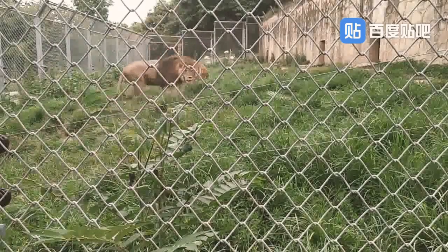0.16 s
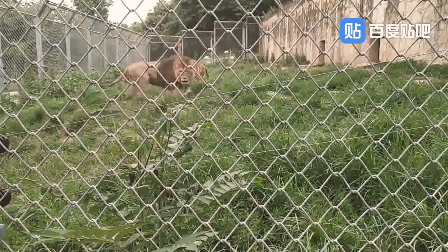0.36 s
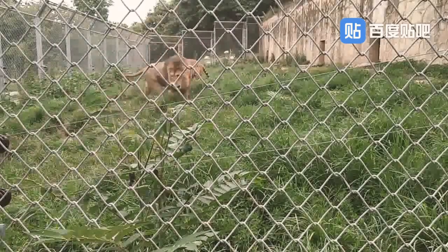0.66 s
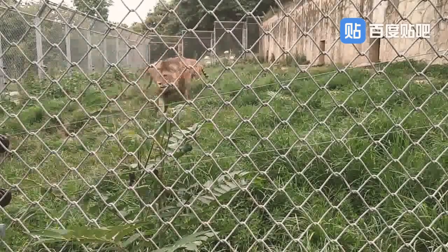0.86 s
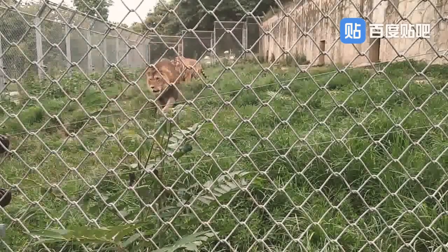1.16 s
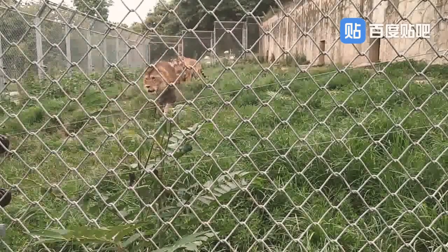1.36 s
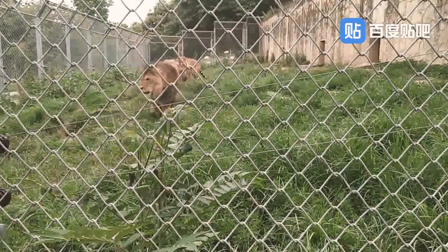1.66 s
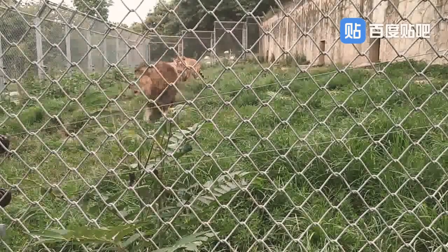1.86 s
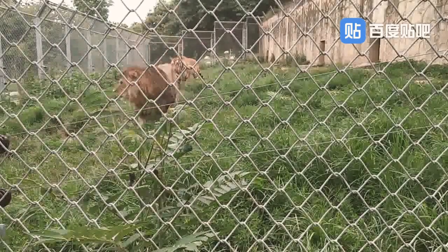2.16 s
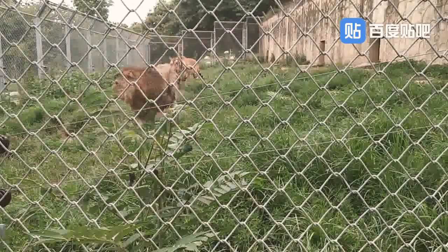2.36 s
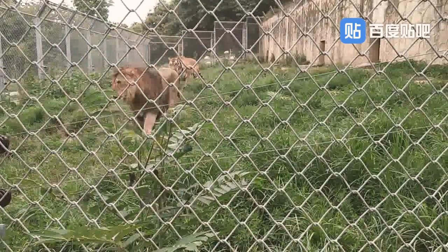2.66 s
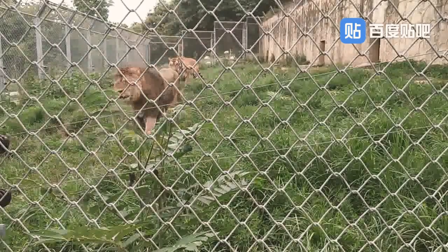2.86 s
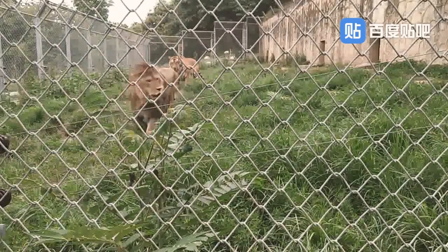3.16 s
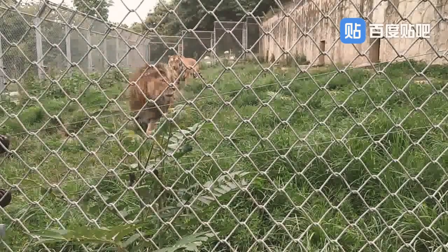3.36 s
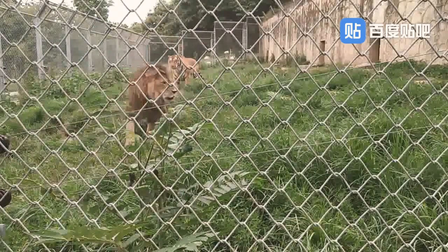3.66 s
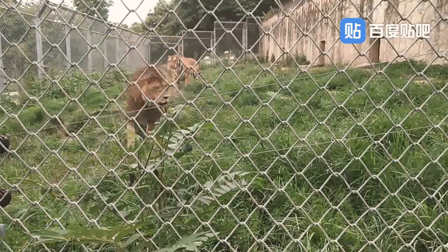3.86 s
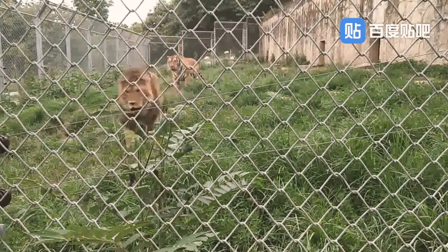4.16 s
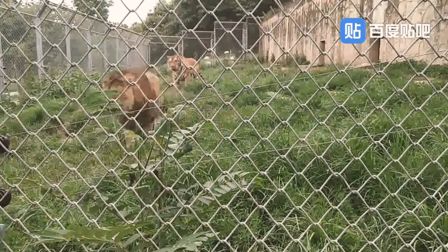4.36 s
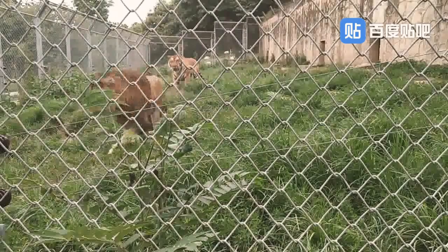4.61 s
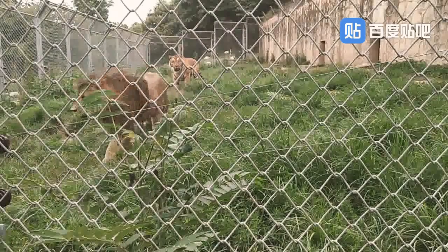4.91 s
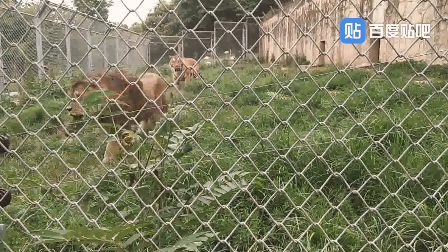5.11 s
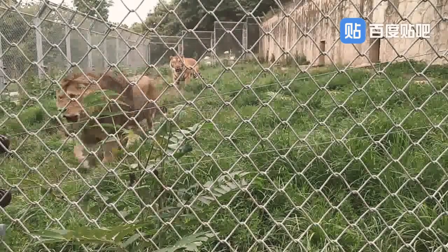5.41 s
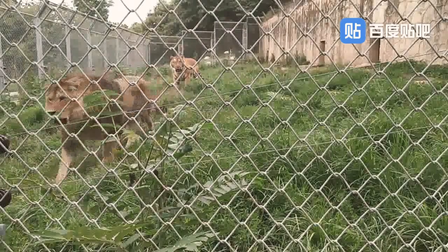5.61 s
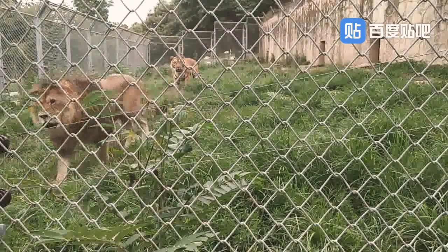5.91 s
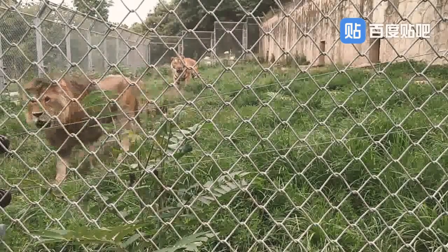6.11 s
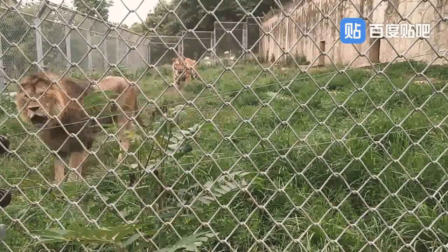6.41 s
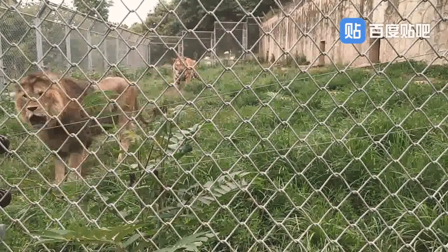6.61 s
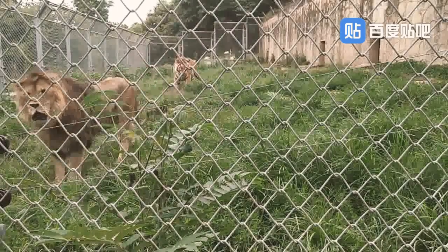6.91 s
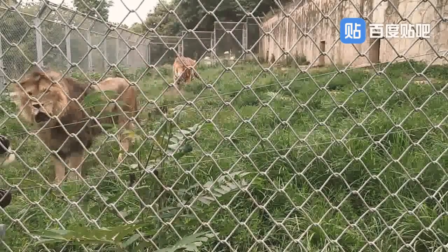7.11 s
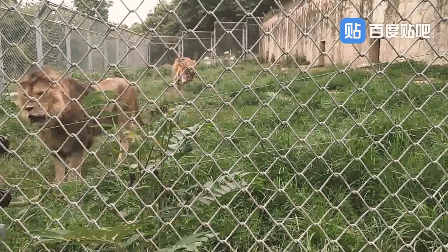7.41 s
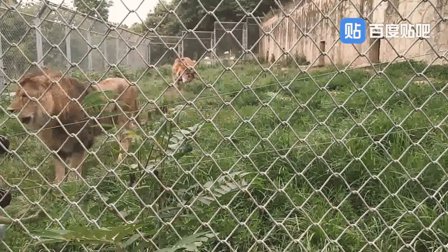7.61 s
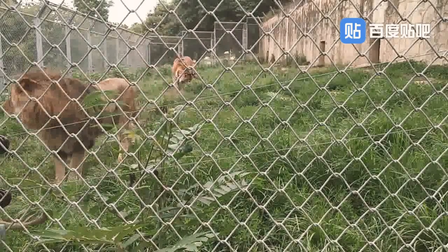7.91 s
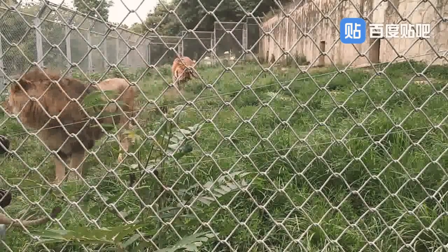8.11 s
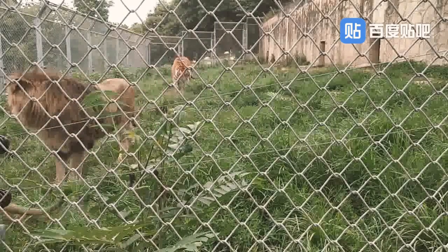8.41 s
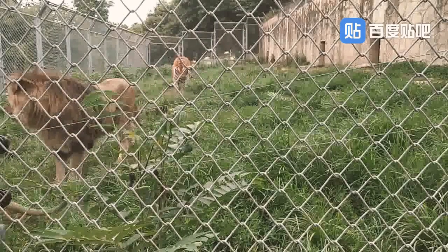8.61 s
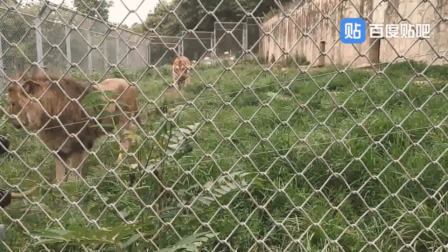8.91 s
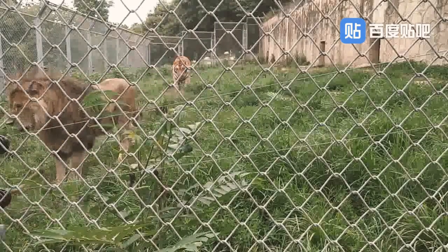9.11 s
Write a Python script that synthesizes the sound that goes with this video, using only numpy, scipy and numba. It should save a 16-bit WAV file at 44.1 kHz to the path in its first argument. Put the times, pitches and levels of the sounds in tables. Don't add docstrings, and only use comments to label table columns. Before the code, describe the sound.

A lion grunts in rapid deep bursts, each a slack, fluttering growl followed by a rasping in-breath, with harsh hisses past the teeth early on. The grunts slow to one every second or less and soften. Cicadas hiss steadily, a far bird chirps in the second half, and another cat rumbles near the end. Outdoors on a grassy slope, mono-like, with a short diffuse echo.

```python
import sys
import numpy as np
from scipy import signal
from scipy.fft import rfft, irfft
from scipy.io import wavfile
from scipy.ndimage import uniform_filter1d
from numba import njit

SR = 44100
rng = np.random.default_rng(int(sys.argv[2]) if len(sys.argv) > 2 else 0)


def transcribe(u):
    v = np.clip(np.atleast_2d(u).T, -1, 1)
    q = np.round(v * 32767).astype(np.int16)
    wavfile.write(sys.argv[1], SR, q)


def volts_from_decibels(level):
    exponent = np.asarray(level, float) / 20
    return 10 ** exponent


N = 408366


def level(x, db):
    return x * volts_from_decibels(db) / np.sqrt(np.mean(x ** 2))


def noise():
    return rng.standard_normal(N)


def curves(table):
    s, *columns = np.transpose(table)
    return [np.interp(np.arange(N) / SR, s, c) for c in columns]


@njit
def svf(x, hz, width):
    y, b, l = np.empty(len(x)), 0., 0.
    for i in range(len(x)):
        g, k = np.tan(np.pi * hz[i] / SR), width / hz[i]
        v = (b + g * (x[i] - l)) / (1 + g * (g + k))
        b, l, y[i] = 2 * v - b, l + 2 * g * v, k * v
    return y


def ring(x, hz, width_hz, skirt=4.46):
    hz = hz + np.zeros(N)
    narrow = svf(x, hz, 1. * width_hz)
    return svf(narrow, hz, skirt * width_hz) / np.sqrt(np.pi * width_hz / SR)


def walk(rate):
    k = int(SR / rate)
    held = np.repeat(rng.standard_normal(N // k + 1), k)
    return 1.3 * uniform_filter1d(uniform_filter1d(held, k), k)[:N]


def coloured(spectrum):
    hz, db = np.transpose(spectrum)
    f = np.maximum(np.arange(N // 2 + 1) * SR / N, 1)
    gain = volts_from_decibels(np.interp(np.log(f), np.log(hz), db, -90, -90))
    return irfft(rfft(noise()) * gain, N)


def tent(peak, db, swell_ms, fall_ms):
    round_db = 6
    ms = (np.arange(N) / SR - peak) * 1000
    below = 20 * np.maximum(-ms / max(swell_ms, 5), ms / max(fall_ms, 5))
    return volts_from_decibels(np.maximum(db + round_db - np.hypot(below, round_db), -200))


# frequency in Hz, level in dB per Hz.
PARK_SPECTRUM = [(34, -17), (58, -0.5), (183, -3), (252, -10.5), (373, -7.5), (459, -19), (534, -16.5),
                 (1070, -24.5), (2270, -23.5), (4000, -25.5), (5200, -42), (6760, -69), (11400, -120)]
# frequency in Hz, level in dB per Hz.
AIR_SPECTRUM = [(9000, -12), (11000, 13), (12500, 3), (15000, 12), (16000, -11)]


def park():
    rumble = volts_from_decibels(1.0 * walk(2.086) + 1.0 * walk(14)) * coloured(PARK_SPECTRUM)
    return level(rumble, -55.5) + level(coloured(AIR_SPECTRUM), -79)


# frequency in Hz, level in dB per Hz.
CHORUS_SPECTRUM = [(2940, -37), (5000, -24.5), (5520, -23.5), (5680, -18.5), (6120, -16), (6650, -8),
                   (6710, -7.5), (7190, -2), (7660, 0), (8510, -3), (9690, -19), (12600, -55),
                   (21300, -120)]
CHORUS_DB = -46
# time in seconds, level in dB, body resonance in Hz.
NEAR_CICADA = [
    (0, -54, 6710),
    (1.8, -57, 6490),
    (1.88, -83, 6560),
    (3.6, -65, 6980),
    (5.5, -53.5, 6650),
    (7.72, -53, 6430),
    (7.8, -66, 6700),
    (8.4, -70, 6680),
    (9.26, -52, 6780),
]


def cicadas():
    click_hz = 475.6
    blur = level(volts_from_decibels(.5 * walk(6.9) + .5 * walk(40)) * coloured(CHORUS_SPECTRUM), CHORUS_DB)
    db, hz = curves(NEAR_CICADA)
    beats = np.cumsum(click_hz * (hz / 6500 + 0.0033 * walk(20))) / SR
    clicks = np.diff(np.floor(beats), prepend=0) * volts_from_decibels(2.0 * noise())
    body = ring(level(clicks, 0) + .6 * noise(), hz, 900., skirt=1.1)
    return blur + volts_from_decibels(db + 1.14 * walk(20)) * level(body, 0)


def insect_spread():
    return level(coloured(CHORUS_SPECTRUM), CHORUS_DB - 17) + level(coloured(AIR_SPECTRUM), -85)


# first chirp in seconds, last chirp in seconds, gap in seconds, level in dB.
BIRD_PHRASES = [
    (4.612, 4.95, .081, -67),
    (5.182, 5.6, 0.076, -68),
    (6.093, 6.27, 0.081, -58),
    (6.503, 6.6, 0.075, -61),
    (6.937, 7.3, 0.076, -62.5),
    (7.351, 7.8, .106, -59.5),
    (7.865, 7.99, .109, -62),
    (8.29, 8.3, .09, -51.5),
    (8.755, 9.21, .088, -61.5),
]


def bird():
    chirp_hz, spread_hz, spread_db = 2316, 197, 0.5
    out, t = np.zeros(N + SR), np.arange(int(0.035 * SR)) / SR
    shape = np.sin(np.pi * t / t[-1]) ** 2
    for first, last, gap, db in BIRD_PHRASES:
        starts = np.arange(first, max(last, first + .001), gap)
        chance = rng.standard_normal((8, 2 + len(t)))
        for s, (pitch, size, *air) in zip(starts, chance):
            cycles = (chirp_hz + spread_hz * pitch) * (t * .8 + 8.0 * t ** 2)
            hoarse = .6 + .9 * uniform_filter1d(air, size=30) * np.sqrt(30)
            gain = volts_from_decibels(db + 0.5 + spread_db * size)
            at = int(s * SR)
            out[at:at + len(t)] += gain * shape * hoarse * np.sin(2 * np.pi * cycles)
    return out[:N]


# time in seconds, level in dB, chest resonance in Hz.
FAR_RUMBLE = [
    (8.05, -66, 159),
    (8.186, -71, 170),
    (8.196, -51, 172),
    (8.348, -43, 187),
    (8.666, -51, 180),
    (8.822, -43, 198),
    (9.1, -44.5, 187),
]


def far_cat():
    db, hz = curves(FAR_RUMBLE)
    db[:int(FAR_RUMBLE[0][0] * SR)] = -120
    db[int(FAR_RUMBLE[-1][0] * SR):] -= 4
    throbs = volts_from_decibels(1.2 * walk(25)) * noise()
    return volts_from_decibels(db - 7.0) * (ring(throbs, hz, 42.0) + volts_from_decibels(-18.0) * ring(throbs, 287.0, 47.0))


# start in seconds, level in dB, time to fall 60 dB in seconds.
SNARLS = [
    (.52, -45.5, 1),
    (.70, -69, 0.23),
    (1.506, -41.5, 1),
    (2.535, -56, 0.37),
]
# frequency in Hz, level in dB per Hz.
SNARL_SPECTRUM = [(300, -35), (550, 5), (850, -0.5), (1500, -12), (3000, -16), (4000, -11), (5200, -14),
                  (9000, -33), (15500, -40)]


def snarls():
    t = np.arange(N) / SR
    push = sum((t > s) * volts_from_decibels(db - 60 * np.abs(t - s) / t60) for s, db, t60 in SNARLS)
    return push * volts_from_decibels(2.1 * walk(81.8)) * level(coloured(SNARL_SPECTRUM), 0)


# peak in seconds, level in dB, ms to swell 20 dB, ms to fall 20 dB.
WHISTLES = [
    (3.02, -69, 250, 150),
    (4.96, -66, 300, 80),
    (6.58, -68, 150, 80),
]


def nostril_whistle():
    breath = sum(tent(*w) for w in WHISTLES) * noise()
    return ring(breath, 1670, 73)


# first flap in seconds, end in seconds, flaps a second,
# share of clean flaps from 0 to 1.
FLAP_RUNS = [(0.269, 0.43, 30.0, .55), (0.700, 0.74, 48.0, .7), (0.979, 1.07, 33.0, .45),
             (1.089, 1.24, 23.8, .9), (1.360, 1.44, 17.7, .3), (1.510, 1.63, 30.3, .4),
             (1.928, 1.99, 42.0, .55), (2.000, 2.22, 25.3, .8), (2.536, 2.59, 27.0, .75),
             (2.667, 2.82, 24.4, .75), (2.840, 2.95, 24.0, .6), (3.241, 3.30, 27.0, .5),
             (3.387, 3.40, 40.0, .5), (3.409, 3.69, 23.6, .8), (4.226, 4.34, 23.0, .7),
             (4.364, 4.52, 22.7, .85), (5.041, 5.20, 20.6, .8), (5.728, 6.02, 22.5, .75),
             (6.657, 6.76, 21.0, .6), (6.774, 6.79, 36.0, .8), (6.801, 6.99, 22.0, .75),
             (7.725, 7.78, 40.0, .6), (7.796, 7.98, 25.0, .85), (9.135, 9.22, 23.5, .75)]


def folds():
    t = np.arange(N) / SR
    slaps, edge, air = np.zeros(N), np.zeros(N), np.ones(N)
    for start, end, rate_hz, share in FLAP_RUNS:
        chance = rng.standard_normal((16, 2))
        air[(t > start - .022) & (t < start)] *= .5
        on = (t >= start) & (t < end)
        phase = rate_hz * (t[on] - start)
        flap = phase.astype(int)
        size = np.sqrt(share) * volts_from_decibels(1.2 * chance[flap, 0])
        since = phase % 1 / rate_hz
        air[on] = np.sqrt(1 - share) * (.75 + 1.3 * np.exp(-since / .02))
        unit = np.sqrt(SR / rate_hz)
        slaps[on] = size * unit * (np.diff(np.floor(phase), prepend=-1) > 0)
        bounce = np.diff(np.floor(phase + .5), prepend=0) > 0
        slaps[on] += .35 * size * volts_from_decibels(3 * chance[flap, 1]) * unit * bounce
        edge[on] = size * np.exp(-since / .005) / np.sqrt(rate_hz * .005 / 2)
    breath = air * volts_from_decibels(2.53 * walk(45)) * noise()
    spatter = edge * noise()
    deep = breath - slaps
    ragged = breath - .75 * slaps + .6 * spatter
    spit = breath + spatter - .2 * slaps
    return deep, ragged, spit


# start in seconds, length in seconds, chest level in dB,
# throat and mouth levels in dB relative to chest.
GRUNTS = [(-.01, 0.01, -26.5, 6, -11), (0.27, 0.13, -31, -6, -18), (0.698, 0.024, -29, -7, -11.5),
          (0.977, 0.083, -36.5, -4, -7), (1.09, 0.082, -33.5, -3, -9.5), (1.51, 0.042, -35, -0.5, -18),
          (1.572, 0.032, -26.5, -6, -14.5), (1.925, 0.056, -34.5, -3.5, -8.5),
          (1.998, 0.041, -34.5, -5.5, -7), (2.077, 0.096, -37.5, -4.5, -8), (2.53, 0.031, -38, -2.5, -2.5),
          (2.778, 0.041, -41, -5, -1), (3.409, 0.069, -35.5, -5.5, -8.5), (3.494, 0.14, -38.5, -10.5, -13),
          (4.31, 0.09, -46.5, -6, -5.5), (5.724, 0.079, -34.5, -6, -12), (5.8, 0.096, -43.5, -8, -5),
          (6.775, 0.082, -40, -13, -6), (7.725, 0.13, -45, -23, -17.5)]
SWELLS = [
    (.3, 0.1, -32.5, -3.5, -12),
    (2.705, 0.054, -35, -7.5, -8.5),
    (4.26, 0.055, -40.5, -9.5, -5),
    (5.06, 0.1, -43, -8.5, -4.5),
    (6.67, 0.096, -39.5, -10, -7),
    (9.13, .07, -50, -20, -13),
]
TAILS = [(1.17, 0.046, -43, -8.5, -17), (2.16, 0.038, -40.5, -7, -20), (2.84, 0.094, -43.5, -16.5, -22.5),
         (3.62, 0.036, -40, -8, -24), (4.405, 0.094, -46, -19, -25.5), (5.9, .12, -45.5, -14.5, -26),
         (6.87, 0.1, -44.5, -19.5, -40), (7.83, 0.11, -46, -27, -37)]
# peak in seconds, chest level in dB, mouth level in dB relative to chest,
# ms to swell 20 dB, ms to fall 20 dB.
GASPS = [(0.148, -37.5, -7, 63, 46), (0.571, -32.5, -6.5, 110, 50), (.89, -31, -13, 81, 26),
         (1.401, -39.5, -4.5, 114, 56), (1.79, -40, -3.5, 80, 75), (2.52, -46, -5, 83, 30),
         (3.271, -47, -4.5, 77, 22), (3.39, -42.5, -2, 39, 21), (4.09, -60.5, 0, 146, 60),
         (4.22, -55.5, 3, 33, 30), (5.6, -66.5, 6.5, 53, 54), (5.71, -43, -2.5, 30, 19)]
SIGHS = [
    (3.08, -57, -15.5, 90, 90),
    (3.75, -61, -17, 50, 400),
    (6.323, -54, -17, 180, 180),
    (7.38, -52, -15, 140, 110),
]


def effort():
    attack_s, swell_s = 0.0062, 0.067
    sag_db_per_s, release_db_per_s = 10, 515
    closing_db_per_s = 0, 37, 52, 55
    teeth_db, gasp_teeth_db = -10, -13
    t = np.arange(N) / SR
    out = np.full((4, N), 1e-6)
    for pushes, rise in ((GRUNTS, attack_s), (SWELLS + TAILS, swell_s)):
        for start, length, db, throat_db, mouth_db in pushes:
            on = (t > start - .15) & (t < start + length + .3)
            since = t[on] - start
            late = np.clip(since, 0, length) - length / 2
            push = db - sag_db_per_s * late
            push = push - release_db_per_s * np.maximum(since - length, 0)
            push = push + 20 * np.minimum(since, 0) / rise
            above = np.array([0, throat_db, mouth_db, mouth_db + teeth_db])[:, None]
            gain = volts_from_decibels(push + above - np.outer(closing_db_per_s, late))
            out[:, on] = np.maximum(out[:, on], gain)
    inward = np.zeros((4, N))
    for rows, throat_db in ((GASPS, -1), (SIGHS, 13)):
        for s, db, mouth_db, *slopes in rows:
            above = np.array([0, min(mouth_db + throat_db, 0), mouth_db, mouth_db + gasp_teeth_db])
            inward += np.outer(volts_from_decibels(above), tent(s, db, *slopes))
    share = inward[0] ** 4 / (inward[0] ** 4 + out[0] ** 4)
    return np.hypot(out, inward), share


# start in seconds, then chest, throat,
# lower mouth and upper mouth resonances in Hz.
JAW_POSTURES = [(.265, 103.4, 333, 872, 1262), (.695, 115, 322, 894, 1247), (.975, 110, 366, 892, 1215),
                (1.085, 106, 350, 937, 1285), (1.505, 112, 356, 885, 1250), (1.925, 111, 330, 840, 1215),
                (1.995, 107, 334, 864, 1224), (2.3, 124, 400, 862, 1073), (2.66, 120, 352, 960, 1180),
                (3.0, 110, 379, 884, 1140), (3.4, 112.7, 338, 950, 1250), (4.22, 111, 375, 998, 1210),
                (5.02, 117, 376, 980, 1136), (5.7, 114, 375, 1056, 1520), (6.1, 158, 266, 826, 1410),
                (6.6, 114.6, 385, 988, 1310), (7.1, 159, 256, 934, 1440), (7.7, 117, 365, 697, 1250),
                (9.05, 105.8, 368, 760, 1430)]


def tract(inward):
    glide_hz_per_s, glide_s = (-44, 0, 382, 232), 0.19
    gasp_shift_hz = 28.2, 40, 94, 34.2
    t, (s, *held) = np.arange(N) / SR, np.transpose(JAW_POSTURES)
    now = np.maximum(np.searchsorted(s, t) - 1, 0)
    glide = np.outer(glide_hz_per_s, np.clip(t - s[now], 0, glide_s) * (1 - inward))
    hz = np.array(held)[:, now] + glide + np.outer(gasp_shift_hz, inward)
    return uniform_filter1d(hz, size=600)


# time in seconds, teeth resonance in Hz, rasp in dB.
BARED_TEETH = [(0, 2270, 6.5), (.3, 2150, 7.5), (.5, 2320, -2.5), (1, 2130, 2.5), (1.2, 2250, -6.5),
               (1.55, 2350, -3), (1.95, 2450, -4.5), (2.55, 2480, -0.5), (2.75, 2250, -0.5), (3.5, 2315, 2),
               (4.3, 2270, 4), (5.1, 2390, -0.5), (5.8, 2370, 5), (6.75, 2270, 4), (7.8, 2320, 5)]
# multiple of the teeth resonance, width in Hz, level in dB.
TEETH_MODES = [(.83, 110, -3), (1, 100, 0), (1.25, 220, -5), (1.62, 220, -8), (1.2, 1800, -3)]


def teeth_rasp(spit):
    teeth_hz, bared_db = curves(BARED_TEETH)
    spit = volts_from_decibels(bared_db - 5.5) * spit
    out = np.zeros(N)
    for multiple, width_hz, db in TEETH_MODES:
        drive = volts_from_decibels(db + 2.5 * walk(15)) * spit
        out += ring(drive, multiple * teeth_hz * (1 + .025 * walk(12)), width_hz)
    return out


# frequency in Hz, width in Hz, level in dB relative to throat.
NOSE_MODES = [(270, 138, -9.5), (471, 24.5, -10.5), (700, 114, -16.5)]


def lion():
    (chest, throat, mouth, teeth), inward = effort()
    deep, ragged, spit = folds()
    chest_hz, throat_hz, lower_hz, upper_hz = tract(inward)
    nose = sum(volts_from_decibels(db) * ring(throat * ragged, hz, width_hz) for hz, width_hz, db in NOSE_MODES)
    chest_tone = ring(chest * deep, chest_hz, 27.)
    throat_tone = ring(throat * deep, throat_hz, 33.)
    lower, upper, lips = (volts_from_decibels(db + 2.94 * walk(28)) * mouth * ragged for db in (-3, -4, -18))
    mouth_tone = ring(lower, lower_hz, 55.) - ring(upper, upper_hz, 90.) + ring(lips, 1625, 180)
    rasp = teeth_rasp(teeth * spit)
    return chest_tone - throat_tone + nose + mouth_tone + rasp + nostril_whistle()


def slope(x):
    t60_s, tail_db = 0.21, -10.5
    t = np.arange(SR // 3) / SR
    tail = rng.standard_normal(len(t)) * volts_from_decibels(-60 * t / t60_s) * (t > .008)
    return x + signal.fftconvolve(x, level(tail, tail_db) / np.sqrt(len(t)))[:N]


def scene():
    mid = slope(lion() + snarls() + far_cat() + bird()) + cicadas() + park()
    side = insect_spread()
    return np.array([mid + side, mid - side])


def top_cut(x):
    return signal.sosfilt(signal.butter(12, 15500, fs=SR, output="sos"), x)


def record(dry):
    top_hz = 15500
    low_pass = signal.ellip(8, .2, 70, top_hz, fs=SR, output="sos")
    return top_cut(signal.sosfilt(low_pass, dry))


dry = scene()
out = record(dry)
transcribe(out)
```